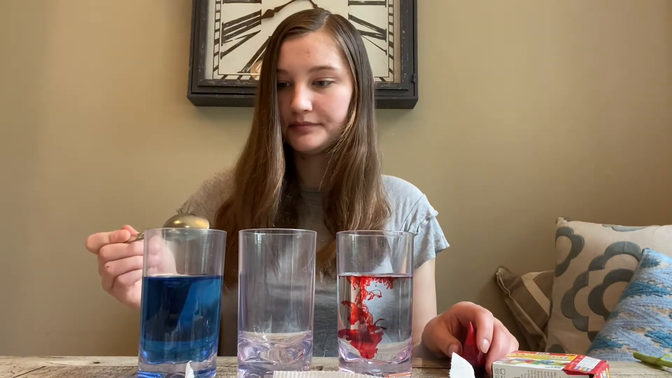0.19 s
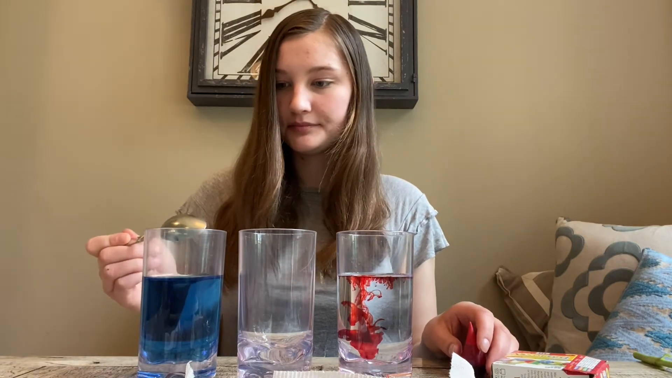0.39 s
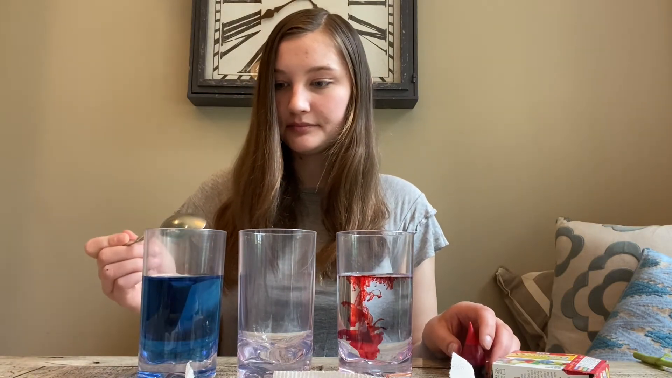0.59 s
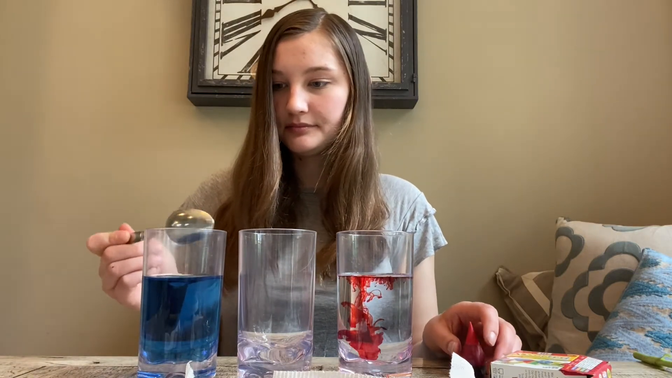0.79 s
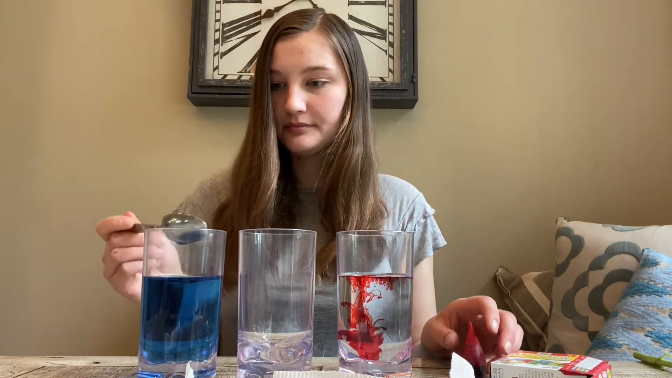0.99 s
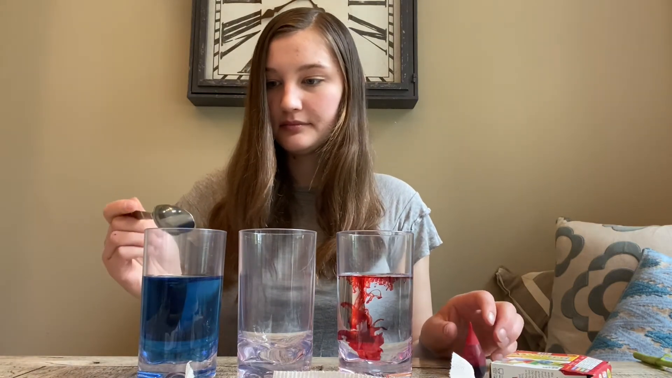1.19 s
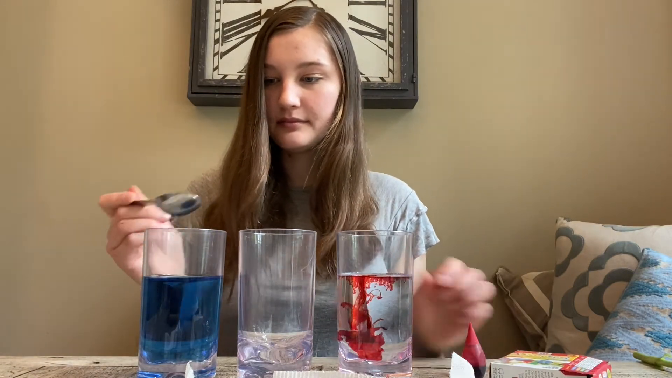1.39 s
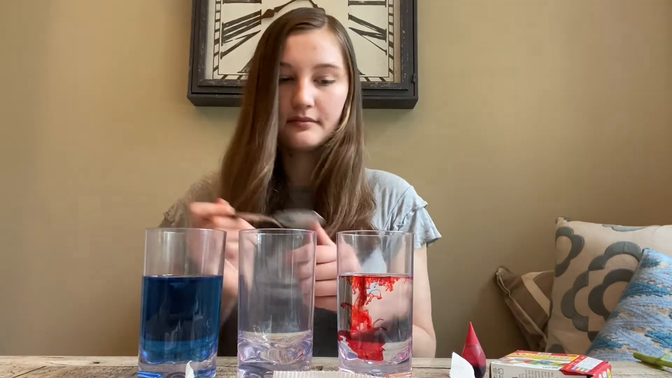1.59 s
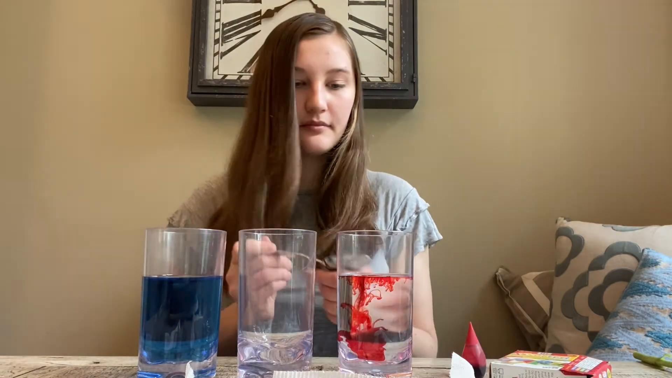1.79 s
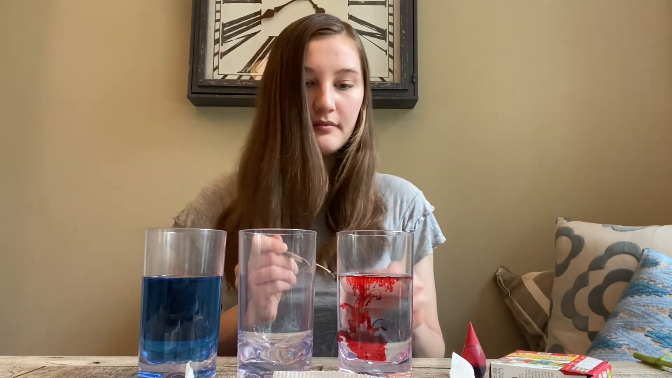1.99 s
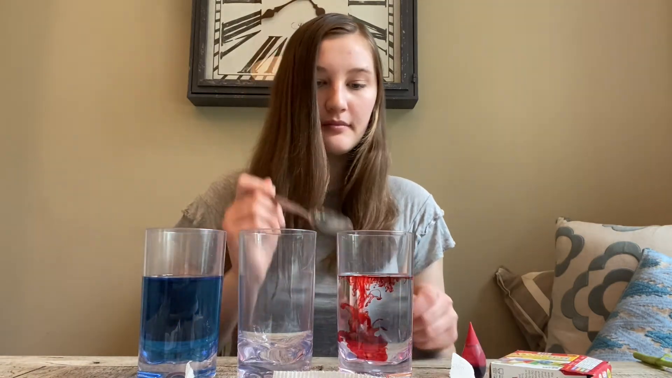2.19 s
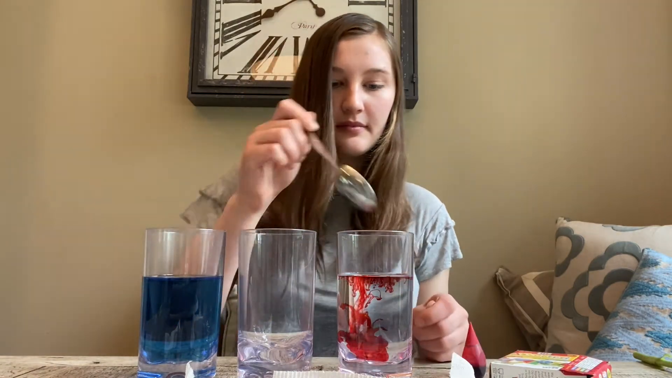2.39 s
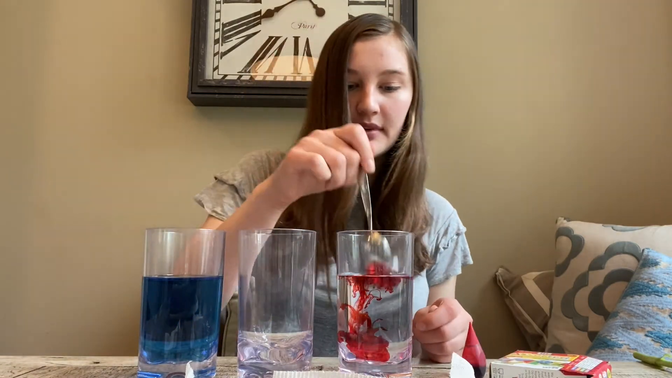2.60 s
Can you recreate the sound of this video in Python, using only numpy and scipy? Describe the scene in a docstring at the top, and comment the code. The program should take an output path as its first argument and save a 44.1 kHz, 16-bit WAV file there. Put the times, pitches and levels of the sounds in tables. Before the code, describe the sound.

Spoon knocking on a full plastic tumbler, five quick taps growing harder, then faint ticks.

```python
"""Over the low hum of a small room, a metal spoon taps the rim of a full plastic tumbler five times,
harder each time, to shake off the drops. Each tap clicks and chatters at the rim and thuds through
the wooden table, and after the hard ones the tumbler rocks back. Then a hand nudges the table, and
the spoon moves to the next cup with a few faint ticks, singing softly."""
import sys
import numpy as np
from scipy import signal
from scipy.fft import rfft, irfft
from scipy.io import wavfile

SR = 44100
rng = np.random.default_rng(int(sys.argv[2]) if len(sys.argv) > 2 else 0)


def digitize_waveform(pressure):
    """Quantize a signal to 16-bit integers and store it at the path in sys.argv[1].

    Rows of a 2-D input are taken as channels; values are limited to [-1, 1].
    """
    field = np.atleast_2d(pressure).T
    bounded = np.clip(field, -1, 1)
    quanta = np.round(bounded * 32767).astype(np.int16)
    wavfile.write(sys.argv[1], SR, quanta)


N = 114660
T = np.arange(N) / SR
HZ = np.maximum(np.arange(N // 2 + 1) * SR / N, 1)

# The room's reverb. Each row: frequency in Hz, t60 in seconds.
ROOM_DECAY = [(80, 0.84), (300, 0.4), (1000, 0.54), (2500, 0.45), (5000, 0.33), (11000, 0.3)]


def from_db(db):
    """Decibels to gain."""
    return 10 ** (np.asarray(db) / 20)


def at_hz(points, hz):
    """Read a curve on a log-frequency axis."""
    freqs, values = np.transpose(points)
    return np.interp(np.log(hz), np.log(freqs), values)


def decay(t60):
    """An envelope that falls 60 dB in t60 seconds."""
    return np.exp(-np.log(1000) * T / t60)


def add(out, start_s, sound):
    """Mix a sound in from its start time."""
    start = int(start_s * SR)
    out[:, start:] += sound[:, :N - start]


def butter(x, kind, hz, order):
    """Causal Butterworth filter."""
    return signal.sosfilt(signal.butter(order, hz, kind, fs=SR, output="sos"), x)


def bring_out(x, hz, db, octaves):
    """Lift one resonance with a bell-shaped boost."""
    half = 2 ** (octaves / 2)
    return x + (from_db(db) - 1) * butter(x, "band", (hz / half, hz * half), order=1)


def stereo_noise(correlation):
    """Spectra of left and right white noise with a given correlation."""
    mid, side = rfft(rng.standard_normal((2, N)))
    return np.sqrt((1 + correlation) / 2) * mid + np.sqrt((1 - correlation) / 2) * side * [[1], [-1]]


def noise_band(offset, correlation):
    """Bell-shaped noise band of rms 1; offset is each frequency's distance from the centre, in widths."""
    band = irfft(stereo_noise(correlation) * np.exp(-.5 * offset ** 2), N)
    return band / band.std()


def burst(levels, t60s, build_up_cycles=.83):
    """Diffuse noise in half-octave bands, each swelling quickly and dying at its own rate."""
    # Stereo width. Each row: frequency in Hz, left-right correlation.
    width = [(60, 0.89), (150, .7), (300, 0.56), (600, -0.43), (2000, -0.012), (10000, 1)]
    noise = stereo_noise(at_hz(width, HZ)) * from_db(at_hz(levels, HZ))
    out = np.zeros((2, N))
    for hz in 45 * 2 ** (np.arange(18) / 2):
        band = irfft(noise * (np.abs(np.log2(HZ / hz)) < 1 / 4), N)
        makeup_gain = np.sqrt(SR / (hz * np.log(2)))
        swell = 1 - np.exp(-T * hz / build_up_cycles)
        out += band * makeup_gain * swell * decay(at_hz(t60s, hz))
    return out


def placed(x):
    """Spread a mono sound in stereo by level and phase."""
    # Each row: frequency in Hz, left minus right in dB.
    balance = [(100, -1.5), (250, 5.5), (400, -5), (650, 3), (1150, -6), (1700, 5.5), (4000, -3)]
    # Each row: frequency in Hz, phase lead of the left in radians.
    left_lead = [(150, .25), (300, .54), (400, 1.84), (540, -1.9), (860, 0.53), (1100, 1.7), (2000, 1.35),
                 (5000, -0.053)]
    pan = from_db(at_hz(balance, HZ) / 2) * np.exp(.5j * at_hz(left_lead, HZ))
    return irfft(rfft(x) * np.array([pan, 1 / pan]), N)


def room_tone():
    """A steady low rumble that reaches the left first, with faint hiss and mains hum."""
    # Colour of the air. Each row: frequency in Hz, relative level in dB.
    colour = [(15, -64), (25, -28), (43, -6.5), (66, -6.5), (93, -13.5), (110, -3), (130, -2), (141, -7),
              (175, -1.5), (229, -8.5), (262, -8), (300, -11), (372, -15), (514, -22), (621, -17.5),
              (674, -24.5), (932, -28.5), (1980, -44), (2330, -45), (6000, -54.5), (8300, -51),
              (15900, -68)]
    # Its stereo width. Each row: frequency in Hz, left-right correlation.
    width = [(60, 0.39), (200, 0.67), (500, 0.095), (1500, 0.15), (5000, 0.13), (10000, 0.8)]
    hum_hz, left_lead_s = 111.7, .00033
    lead = np.exp(2j * np.pi * HZ * left_lead_s * np.array([[1], [0]]))
    air = irfft(stereo_noise(at_hz(width, HZ)) * from_db(at_hz(colour, HZ)) * lead, N)
    air = butter(air, "low", hz=12500, order=6)
    hum = np.sin(2 * np.pi * hum_hz * T)
    bed = from_db(-54.5) * air / air.std() + from_db(-58.5) * hum
    return bed * from_db([[-.9], [.8]])  # leans right


def spoon_singing():
    """The freed spoon sings in faint, rough, narrow tones."""
    # Each row: start in seconds, pitch in Hz, level in dB, swell in seconds, t60 in seconds.
    rings = [(.21, 3410, -74, .05, .9), (1.386, 4140, -84, .004, .35), (2.51, 3380, -72, .04, .55),
             (2.53, 4130, -81, .015, .25)]
    width_hz = 110
    out = np.zeros((2, N))
    for start, hz, db, swell_s, t60 in rings:
        ring = noise_band((HZ - hz) / width_hz, correlation=.41)
        add(out, start, from_db(db) * ring * (1 - np.exp(-T / swell_s)) * decay(t60))
    return out


def faint_ticks():
    """Light ticks of the spoon and of drops, each with a little room tail."""
    # Each row: start in seconds, centre in Hz, width in octaves, level in dB,
    # tail against the tick in dB, left-right correlation.
    ticks = [(1.077, 5050, 0.96, -80, -12, .52), (1.3851, 774, 0.54, -53.5, -11, -0.29),
             (1.387, 2810, .6, -74, -12, .2), (1.992, 9000, 0.28, -80, -9, .3),
             (2.45, 4000, .7, -68, -15.5, 0.44), (2.5475, 13900, 0.32, -52, -29, -0.68),
             (2.558, 12030, 0.34, -66, -17, -.2)]
    out = np.zeros((2, N))
    for start, hz, octaves, db, tail_db, correlation in ticks:
        noise = noise_band(np.log2(HZ / hz) / octaves, correlation)
        envelope = decay(t60=.013) + from_db(tail_db) * decay(at_hz(ROOM_DECAY, hz))
        add(out, start, from_db(db) * noise * envelope)
    return out


def hand_nudges(thump):
    """A hand nudges the table: a soft, narrow band of its thump."""
    # Each row: start in seconds, gain in dB.
    nudges = [(1.033, -24), (1.385, -37)]
    bump = butter(thump, "band", hz=(142, 217), order=2)
    out = np.zeros((2, N))
    for start, db in nudges:
        add(out, start, from_db(db) * bump)
    return out


def table_thud():
    """A bending wave crosses the table top, treble first; table and tumbler ring and the room answers."""
    # Colour of the wave. Each row: frequency in Hz, gain in dB.
    wave_colour = [(100, -11), (250, 15), (420, 13.5), (650, 22.5), (900, 14), (1300, 12.5), (1600, 9),
                   (2200, -1), (3000, -16), (6000, -40)]
    # The loaded table, then the tumbler's wall. Each row: pitch in Hz, level in dB, t60 in seconds.
    table_modes = [(64.95, -31.5, 0.59), (96.3, -25.5, 0.36), (151.5, -21, 0.4), (167.3, -13.5, .14),
                   (204.1, -31.5, 0.2), (261.5, -22, 0.37), (310.3, -34, 0.33), (371.6, -13, .058),
                   (396.7, -14, 0.17), (492.2, -24, 0.17), (551, -23.5, 0.12), (657, -22, 0.16),
                   (750, -27, .16), (865.8, -35, 0.3)]
    tumbler_modes = [(983, -30.5, .14), (1020, -45.5, 0.042), (1125, -35.5, 0.17), (1228, -31, 0.11),
                     (1338, -29.5, 0.098), (1645, -42, 0.23), (1728, -42, 0.2), (1990, -54.5, .25),
                     (2097, -50, 0.37)]
    # The room tail. Each row: frequency in Hz, level in dB per half octave.
    tail = [(60, -47.5), (130, -32.5), (300, -26.5), (550, -30.5), (1100, -41.5), (1900, -46),
            (2800, -53.5), (4500, -47.5), (8000, -76.5)]
    travel_s_at_1khz, round_trip_s, edge_loss_db, build_up_cycles = .00217, .0063, 7, .38
    travel_s = travel_s_at_1khz * np.sqrt(1000 / HZ)
    chirp = from_db(at_hz(wave_colour, HZ)) * np.exp(-4j * np.pi * HZ * travel_s)
    edge_echo = -from_db(-edge_loss_db) * np.exp(-2j * np.pi * HZ * round_trip_s)
    low_cut = HZ ** 2 / (HZ ** 2 + table_modes[0][0] ** 2)  # fades below the lowest mode
    body = irfft(chirp * (1 + edge_echo + edge_echo ** 2) * low_cut, N)
    for k, (hz, db, t60) in enumerate(table_modes + tumbler_modes):
        swell = 1 - np.exp(-T * hz / build_up_cycles)
        body += (-1) ** k * from_db(db) * np.sin(2 * np.pi * hz * T) * swell * decay(t60)
    return (placed(body) + burst(tail, ROOM_DECAY)) * (T < T[-1] / 2)


def rim_click():
    """Metal on plastic: a short crack and the room's answer."""
    # The crack, then its room tail. Each row: frequency in Hz, level in dB per half octave.
    colour = [(1000, -72), (2300, -38.5), (2800, -39.5), (3500, -27.5), (4300, -38), (5200, -39),
              (7000, -38), (9000, -60.5), (12000, -68.5), (16000, -75.5)]
    tail = [(1000, -48.5), (2500, -68), (3400, -62), (5100, -69), (7000, -67), (9500, -81.5), (12000, -87),
            (16000, -105)]
    t60_s = .0097  # in every band
    crack = burst(colour, [(HZ[-1], t60_s)], build_up_cycles=3.3)
    return (crack + burst(tail, ROOM_DECAY)) * (T < T[-1] / 2)


def spoon_modes():
    """The modes of spoon and rim, each a narrow, slightly rough band of ringing noise."""
    # Each row: pitch in Hz, level in dB, t60 in seconds.
    modes = [(2170, -55, .22), (3250, -53, .13), (4000, -63, .16), (4860, -54.5, .19), (5250, -61, .17),
             (6900, -66, .13), (8420, -69, .13), (9500, -74, .13), (10300, -79, .12), (12000, -77, .14)]
    width_hz = 60
    return np.array([from_db(db) * noise_band((HZ - hz) / width_hz, correlation=.47) * decay(t60)
                     for hz, db, t60 in modes])


def chatter(clink):
    """The spoon rattles as it lands: a quick, uneven run of ever weaker touches."""
    touches, gap_s, loss_db = 3, .0028, 8
    out, start = np.zeros((2, N)), 0
    for k, gap in enumerate(gap_s * np.exp(.3 * rng.standard_normal(touches))):
        add(out, start, from_db(-k * loss_db) * clink)
        start += gap
    return out


def spoon_taps(thump, knock):
    """Harder taps hit louder and brighter; the contact spot makes the blow hollow and the clink bite."""
    # Taps and the tumbler's rebounds. Each row: start in seconds, thump gain in dB, knock gain in dB,
    # hollow resonance in Hz, its boost in dB, contact hardness as a cutoff in Hz, clink gain in dB,
    # biting resonance in Hz, its boost in dB.
    hits = [(.0095, -15.5, -29.5, 175, 5, 800, -15, 6570, 7.5),
            (0.1991, -4, -10, 480, 4, 900, -10.5, 3280, 3),
            (0.365, -1.5, -5, 690, 4.5, 1100, -5.5, 3250, 7.5),
            (0.3953, -8, -14, 300, 6, 1200, -12.5, 6630, 2), (.539, 0, -5, 850, 5.5, 1600, -6.5, 8840, 6.5),
            (0.5666, -13, -13.5, 460, 6, 2000, -15.5, 4860, 4.5),
            (0.714, 0, 0, 590, 4, 3000, -1.5, 5240, 2), (0.7464, -16.5, -37, 500, 3, 4000, -3, 5624, 2.5)]
    click, modes = rim_click(), spoon_modes()
    spread_db = 2.5  # each hit lands on another spot and rebalances the modes
    spots = from_db(spread_db * rng.standard_normal((len(hits), len(modes))))
    out = np.zeros((2, N))
    for hit, spot in zip(hits, spots):
        start, thump_db, knock_db, hollow_hz, hollow_db, hardness_hz, clink_db, bite_hz, bite_db = hit
        blow = from_db(thump_db) * thump + from_db(knock_db) * knock
        blow = bring_out(blow, hollow_hz, hollow_db, octaves=.15)
        blow = butter(blow, "low", hardness_hz, order=1)
        ring = np.einsum("m,mct->ct", spot, modes)
        clink = bring_out(click + ring, bite_hz, bite_db, octaves=.12)
        add(out, start, blow + from_db(clink_db) * chatter(clink))
    return out


def scene():
    """Split the table's thud into low thump and woody knock, then mix all layers over the room."""
    thud = table_thud()
    thump = butter(thud, "low", hz=133, order=1)
    knock = thud - thump
    return spoon_taps(thump, knock) + hand_nudges(thump) + faint_ticks() + spoon_singing() + room_tone()


def record(dry):
    """Roll off the deepest bass and cut the top steeply."""
    top_hz = 15800
    trimmed = butter(dry, "high", hz=43.5, order=2)
    return signal.sosfilt(signal.ellip(10, .1, 80, top_hz, fs=SR, output="sos"), trimmed)


dry = scene()
out = record(dry)
digitize_waveform(out)
```